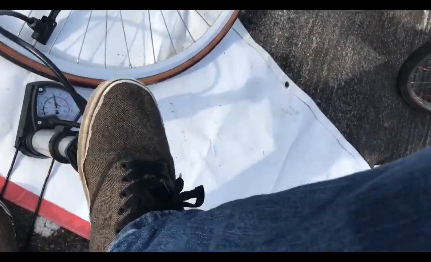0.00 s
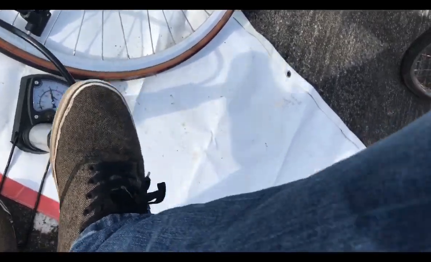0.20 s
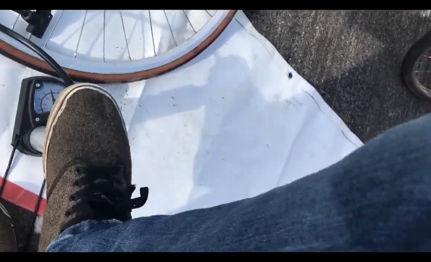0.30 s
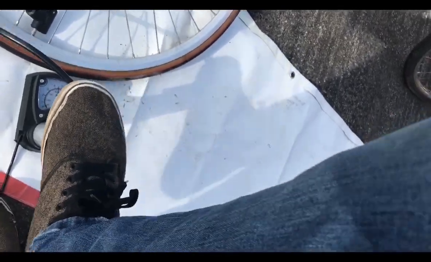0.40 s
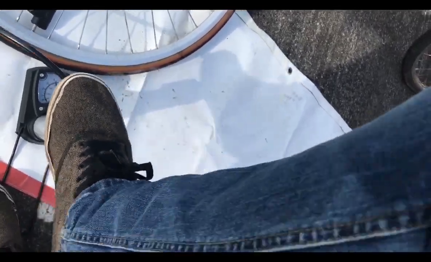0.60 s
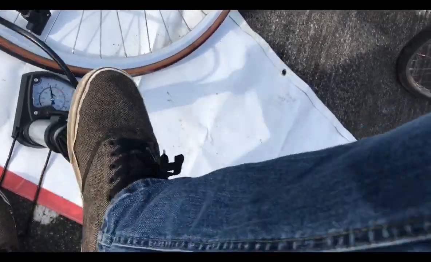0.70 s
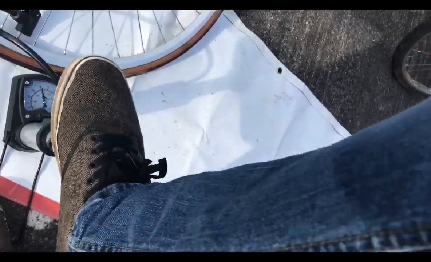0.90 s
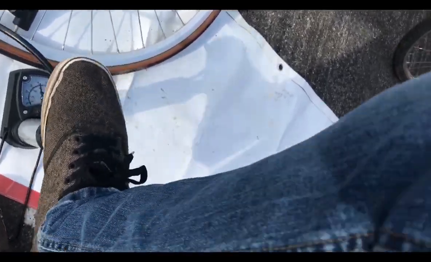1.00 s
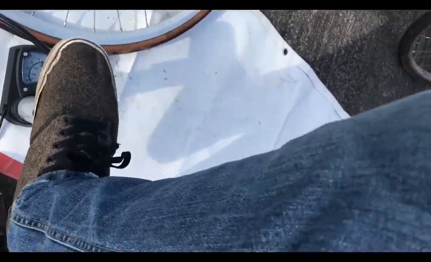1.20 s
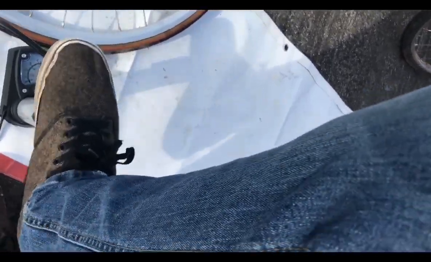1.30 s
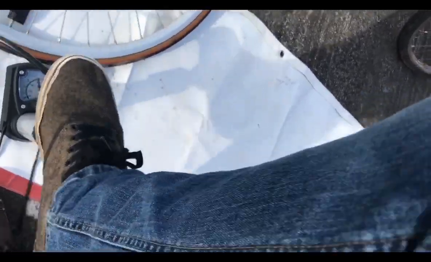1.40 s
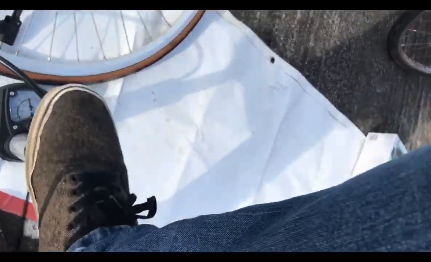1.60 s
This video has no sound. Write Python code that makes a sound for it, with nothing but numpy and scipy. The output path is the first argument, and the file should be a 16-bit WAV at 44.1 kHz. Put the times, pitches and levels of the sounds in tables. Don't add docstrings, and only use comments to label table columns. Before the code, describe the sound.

A foot-operated bicycle pump clacks through two strokes, with brief squeaks and short airy hisses outdoors.

```python
import sys
import numpy as np
from scipy import signal
from scipy.fft import rfft, irfft
from scipy.io import wavfile
from scipy.ndimage import uniform_filter1d

SR = 44100
rng = np.random.default_rng(int(sys.argv[2]) if len(sys.argv) > 2 else 0)


def file_out(sig):
    cols = np.atleast_2d(sig).T
    lim = np.clip(cols, -1, 1)
    pcm = np.round(lim * 32767).astype(np.int16)
    wavfile.write(sys.argv[1], SR, pcm)


def makeup_ratio(level_db):
    decades = np.asarray(level_db, float) / 20
    return 10 ** decades


N = 74970

# [frequency_hz, density_db]
TOWN_SPECTRUM = [(28, -7), (62, -3), (230, -14), (480, -24.5), (1050, -18.5), (2200, -31.5), (5000, -44.5),
                 (16000, -77)]
TOWN_DB, DRONE_HZ, DRONE_DB = -50.5, 68, -59

# [frequency_hz, density_db]
HISS_SPECTRUM = [(900, -31), (1600, -8.5), (3400, -2), (5200, -12), (8500, -2), (10300, -3), (12200, -2),
                 (16000, -5)]
# [frequency_hz, density_db]
RUB_SPECTRUM = [(250, 1), (500, -8), (900, -2), (1400, -10), (2500, -13), (4500, -16.5), (8000, -20.5)]
# [middle_s, rise_s, fall_s, hiss_db, rub_db]
SWELLS = [(.00, .02, 0.0073, -57.5, -51.5), (0.114, 0.021, 0.03, -55.5, -49.5),
          (.20, 0.018, 0.11, -68, -51), (0.363, 0.035, 0.015, -51.5, -45.5), (.54, 0.05, 0.17, -66, -55.5),
          (.586, 0.019, 0.026, -68, -49), (0.645, 0.023, 0.047, -44.5, -52),
          (0.661, 0.018, 0.024, -40.5, -74), (0.867, 0.023, 0.043, -56.5, -51),
          (.96, 0.044, 0.039, -73, -52), (1.115, 0.058, 0.016, -56.5, -45.5),
          (1.179, 0.12, 0.018, -90, -55.5), (1.24, 0.021, 0.03, -65.5, -59.5),
          (1.352, 0.04, 0.051, -63.5, -51.5), (1.408, 0.02, 0.052, -44.5, -50.5),
          (1.431, 0.024, 0.028, -45.5, -72), (1.64, 0.026, 0.04, -64, -49.5)]
# [frequency_hz, width_hz, level_db]
CAVITIES = [(4280, 130, -4.5), (6150, 690, 2.5), (8650, 167, -1.5), (9580, 260, -2.5), (11950, 1200, 0),
            (14550, 770, -3.5)]

# [start_s, level_db, pitch_hz, t60_s]
KNOCKS = [(0.08, -30.5, 380, 0.0081), (.132, -32, 740, 0.0098), (.171, -33, 880, 0.012),
          (0.2281, -20.5, 940, 0.007), (1.329, -39, 611, 0.033), (0.364, -30.5, 514, 0.016),
          (.5445, -29.5, 653, 0.012), (0.614, -38, 987, 0.018), (.835, -39.5, 734, 0.014),
          (.904, -39, 358, 0.0073), (0.9694, -31.5, 636, 0.014), (1.110, -40.5, 297, 0.046),
          (1.1294, -19.5, 400, 0.014), (1.394, -35, 930, 0.0098), (1.467, -50.5, 1375, 0.018),
          (1.614, -39, 910, 0.0079), (1.624, -31.5, 776, 0.0084), (1.656, -44, 805, 0.013),
          (.2945, -43.5, 830, 0.011), (.304, -43, 880, .016), (.312, -44, 900, .014),
          (.320, -45.5, 785, 0.023), (.950, -38.5, 940, 0.011), (1.1055, -24.5, 856, 0.01),
          (1.1075, -31, 1100, 0.015), (1.1115, -34.5, 1050, 0.021), (1.178, -55, 884, 0.098),
          (1.198, -55.5, 865, 0.045), (1.232, -55.5, 810, .02), (1.345, -43.5, 760, 0.015),
          (1.571, -47.5, 403, 0.021)]
# [start_s, level_db, pitch_hz, length_s]
SCUFFS = [(0.0788, -37.5, 3270, 0.007), (0.086, -44, 3080, 0.0014), (0.0996, -40, 2190, 0.0048),
          (0.128, -39, 2400, 0.004), (0.908, -43, 1600, 0.0025), (0.17, -39.5, 2010, 0.0042),
          (0.2285, -24.5, 3720, 0.0026), (0.23, -58, 5200, 0.0015), (0.3666, -31, 1800, 0.001),
          (0.5442, -30, 2370, 0.0062), (0.5445, -32, 3720, 0.0016), (0.614, -36.5, 3920, 0.0023),
          (0.6524, -33, 1890, 0.0025), (0.737, -48, 3050, 0.0036), (0.8356, -28.5, 2950, 0.0024),
          (0.8385, -40.5, 3500, 0.006), (0.8414, -56, 3240, 0.0014), (0.956, -42, 2430, 0.0058),
          (1.107, -30.5, 2470, 0.0021), (1.3267, -29, 1690, 0.0025), (1.3927, -34, 1960, 0.0015),
          (1.5313, -43, 2370, 0.002), (1.573, -43.5, 2000, 0.003), (1.4, -46, 1980, .002),
          (1.552, -52, 2500, .002), (0.188, -44, 2600, .002), (1.6123, -41, 1960, 0.0043)]
# [start_s, level_db, length_s]
TICKS = [(0.158, -36.5, 0.0025), (0.1644, -42, 0.0023), (0.1712, -33.5, 0.0039), (0.1917, -30, 0.0036),
         (0.2045, -30, 0.0033), (0.216, -27, 0.0011), (0.23, -25, 0.0024), (0.3656, -29.5, 0.0057),
         (0.5446, -34.5, 0.0033), (0.782, -50, 0.0064), (0.832, -42, 0.002), (0.26, -44, .002),
         (0.9053, -32.5, 0.0017), (0.9316, -34, 0.003), (0.941, -38, 0.0023), (0.9509, -23, 0.0016),
         (0.953, -33, 0.0036), (0.997, -43.5, 0.013), (1.1297, -24.5, 0.0018), (1.329, -30.5, 0.0011),
         (1.529, -44, 0.0023), (1.555, -68, 0.0018), (1.5725, -47, 0.0015), (1.6878, -34.5, 0.0021)]
# [start_s, level_db, length_s]
LEAKS = [
    (0.61, -43, .014),
    (1.415, -34, 0.015),
    (.645, -33, 0.023),
]

# [start_s, level_db, pitch_hz, t60_s, push_or_pull (1 or -1)]
THUMPS = [(0.19, -51, 60, 0.13, 1), (0.247, -40, 68, 0.08, 1), (0.384, -50, 75, 0.066, 1),
          (0.408, -46, 96, 0.09, 1), (0.454, -46, 79, 0.084, 1), (0.6, -26.5, 106, 0.032, 1),
          (0.662, -48, 62, 0.11, 1), (0.8278, -40.5, 72.5, 0.18, -1), (0.866, -35, 63.7, 0.13, 1),
          (1.139, -43, 162, 0.1, 1), (1.169, -44.5, 235, 0.086, 1), (1.3718, -25, 155, 0.033, -1),
          (1.38, -35.5, 76.5, 0.081, 1), (1.415, -46.5, 58.5, 0.12, 1), (1.54, -52, 88, 0.068, 1)]

# [peak_s, level_db, pitch_hz, sag_hz_per_ms, rise_ms]
BLOWS = [
    (.3657, -24, 760, 60, 1.0),
    (.3691, -17, 960, 60, 1.7),
    (.5464, -22, 1120, 70, 1.7),
    (1.13, -30, 2500, 60, 1.2),
    (1.1306, -36, 4600, 60, 1.2),
    (.2304, -26, 4300, 300, 1.0),
    (1.1311, -11, 960, 270, 1.5),
    (1.3298, -16, 930, 220, 1.5),
]
BLOW_FALL_MS = 1.1
# [start_s, level_db, low_mode_db]
REBOUNDS = [
    (.3716, -19.5, -5),
    (.5481, -27, -12),
    (1.1325, -12.5, -20),
    (1.3323, -23, -2),
]
# [frequency_hz, level_db, t60_s]
FRAME_MODES = [(247, -14, 0.061), (400, -17, 0.0067), (667, -5, 0.021), (830, 6, 0.004), (1050, 0, 0.016),
               (1250, -35, 0.0098), (2470, -8.5, 0.0048)]
# [start_s, level_db]
STRUT_PINGS = [(0.344, -65), (.372, -43.5), (.5478, -42.5), (1.046, -50), (1.084, -41), (1.329, -37.5),
               (1.395, -50)]
STRUT_HZ, STRUT_T60_S = 1934, 0.057

# [time_s, pitch_hz, level_db]
SQUEAKS = [
    [(.326, 930, -62), (.333, 935, -52), (.341, 905, -47), (.347, 885, -36), (.353, 882, -31),
     (.358, 884, -34), (.362, 888, -38), (.3655, 880, -37)],
    [(1.056, 850, -66), (1.066, 868, -48), (1.074, 874, -38), (1.081, 878, -30.5), (1.088, 878, -35),
     (1.097, 876, -35), (1.105, 877, -41), (1.118, 880, -44), (1.125, 890, -58)],
]
# [frequency_ratio, level_db]
SQUEAK_PARTIALS = [(1, 3.5), (.87, -20), (1.13, -15), (1.96, -14.5), (2.2, -24), (3, -31), (4, -31)]
SQUEAK_ROUGH_DB, PARTIAL_ROUGH_DB, SQUEAK_JITTER = 1.2, 3.5, .009

# [start_s, length_s, level_db]
RETURNS = [
    (0.618, .115, -57.5),
    (1.39, .115, -58),
]
BARREL_START_HZ, BARREL_END_HZ, BARREL_WIDTH_HZ = 2710, 7280, 560

ECHO_DB, ECHO_T60_S = -22, .05

# [frequency_hz, gain_db]
TREBLE_TOP = [(15750, 0), (15950, -60)]
# [peak_s, level_db]
SHARP_CLICKS = [
    (.2295, -24),
    (.9515, -6),
    (1.1305, -6),
]
# [frequency_hz, gain_db]
TREBLE_OPEN_TOP = [(16700, 0), (16960, -30)]
SHARP_S = .0025


def shape(x, table):
    hz = np.maximum(np.fft.rfftfreq(N, 1 / SR), 1)
    points = np.array(table, float)
    gain_db = np.interp(np.log(hz), np.log(points[:, 0]), points[:, 1])
    return irfft(rfft(x) * makeup_ratio(gain_db), N)


def level(x, db):
    return x * makeup_ratio(db) / np.sqrt(np.mean(x ** 2))


def walk(rate_hz):
    hold = int(SR / rate_hz)
    steps = rng.standard_normal(1000)[np.arange(N) // hold]
    smooth = uniform_filter1d(uniform_filter1d(steps, hold), hold)
    return level(smooth, 0)


def add(out, start_s, x):
    i = int(start_s * SR)
    out[i:i + len(x)] += x[:max(N - i, 0)]


def ring(hz, t60_s, rise_s):
    t = np.arange(SR // 10) / SR
    rise = 1 - np.exp(-t / max(rise_s, 1e-5))
    decay = np.exp(-np.log(1000) * t / t60_s)
    return rise * decay * np.sin(2 * np.pi * hz * t)


def burst(lo_hz, hi_hz, length_s, rise_s):
    t = np.arange(SR // 10) / SR
    band = signal.butter(3, [lo_hz, min(hi_hz, .45 * SR)], "band", fs=SR, output="sos")
    envelope = (1 - np.exp(-t / rise_s)) * np.exp(-t / length_s)
    x = signal.sosfilt(band, rng.standard_normal(len(t)) * envelope)
    return x / np.abs(x).max()


def patchy(table, quick_db, slow_db):
    octave = np.log2(np.fft.rfftfreq(N, 1 / SR) + 1)
    spectrum = rfft(shape(rng.standard_normal(N), table))
    out = np.zeros(N)
    for centre in np.arange(4.2, 14.8, .7):
        weight = np.clip(1 - np.abs(octave - centre) / .7, 0, 1)
        flicker_db = quick_db * walk(40.34) + slow_db * walk(8.31)
        out += irfft(spectrum * weight, N) * makeup_ratio(flicker_db)
    return level(out, 0)


def cavities(x, depth_db):
    resonant = np.zeros(len(x))
    for hz, width_hz, db in CAVITIES:
        b, a = signal.iirpeak(hz, hz / width_hz, fs=SR)
        resonant += makeup_ratio(db) * signal.lfilter(b, a, x)
    return x + makeup_ratio(depth_db) * resonant


def town():
    drone_band = [(30, -30), (0.66 * DRONE_HZ, -8), (DRONE_HZ, 0), (1.08 * DRONE_HZ, -9), (160, -40)]
    drone = shape(rng.standard_normal(N), drone_band)
    traffic = patchy(TOWN_SPECTRUM, quick_db=1, slow_db=1.5)
    return makeup_ratio(TOWN_DB) * traffic + level(drone, DRONE_DB)


def air():
    t = np.arange(N) / SR
    hiss_power, rub_power = np.zeros(N), np.zeros(N)
    for middle_s, rise_s, fall_s, hiss_db, rub_db in SWELLS:
        bell = np.exp(-((t - middle_s) / np.where(t < middle_s, rise_s, fall_s)) ** 2)
        hiss_power += bell * makeup_ratio(2 * hiss_db)
        rub_power += bell * makeup_ratio(2 * rub_db)
    hiss = level(cavities(patchy(HISS_SPECTRUM, quick_db=2.5, slow_db=3.0), depth_db=0), 0)
    hiss = hiss * makeup_ratio(1.43 * walk(150))
    rub = patchy([(100, -35)] + RUB_SPECTRUM, quick_db=1.5, slow_db=-0.06)
    return hiss * np.sqrt(hiss_power) + rub * np.sqrt(rub_power)


def linkage():
    out = np.zeros(N)
    for s, db, hz, t60_s in KNOCKS:
        knock = ring(hz, t60_s, 0.0015)
        knock += 0.27 * ring(1.33 * hz, t60_s, 0.0009)
        knock += 0.22 * ring(0.67 * hz, t60_s, 0.007)
        add(out, s + 0.00092, makeup_ratio(db + 12.5) * knock)
    for s, db, hz, length_s in SCUFFS:
        scuff = 1.26 * ring(hz, 3 * length_s, 0.00046)
        scuff += .2 * ring(1.285 * hz, 3 * length_s, 0.0011)
        scuff += 0.87 * burst(0.43 * hz, 1.556 * hz, length_s, 0.00053)
        add(out, s, makeup_ratio(db) * scuff)
    for s, db, length_s in TICKS:
        grit = burst(3640, 11600, 0.83 * length_s, 0.00005)
        grit += 0.7 * burst(14100, 17800, 0.92 * length_s, 0.0001)
        add(out, s, makeup_ratio(db - 6.5) * cavities(grit, depth_db=2.5))
    for s, db, length_s in LEAKS:
        add(out, s, makeup_ratio(db) * burst(12600, 14000, length_s, .006))
    return out


def ground():
    out = np.zeros(N)
    for s, db, hz, t60_s, push in THUMPS:
        add(out, s - .0015, np.sign(push) * makeup_ratio(db + 9) * ring(hz, t60_s, .005))
    return out


def frame():
    out = np.zeros(N)
    half = 220
    ms = np.arange(-half, half) / SR * 1000
    for s, db, hz, sag, rise_ms in BLOWS:
        bell = np.exp(-(ms / np.where(ms < 0, rise_ms, BLOW_FALL_MS)) ** 2)
        sweep = np.cos(2 * np.pi * (hz - sag * ms / 2) * ms / 1000)
        add(out, s - half / SR, makeup_ratio(db) * bell * sweep)
    for s, db, low_db in REBOUNDS:
        for hz, mode_db, t60_s in FRAME_MODES:
            gain_db = db + mode_db + low_db * (hz < 900)
            add(out, s, makeup_ratio(gain_db) * ring(hz, t60_s, 0.00051))
    for s, db in STRUT_PINGS:
        add(out, s, makeup_ratio(db) * ring(STRUT_HZ, STRUT_T60_S, 0.0018))
    return out


def squeak():
    out, t = np.zeros(N), np.arange(N) / SR
    for stroke in SQUEAKS:
        s, hz, db = np.array(stroke).T
        pitch_hz = np.interp(t, s, hz) * (1 + SQUEAK_JITTER * walk(200))
        phase = 2 * np.pi * np.cumsum(pitch_hz) / SR
        gain = uniform_filter1d(makeup_ratio(np.interp(t, s, db, -120, -120) + 3), size=40)
        for ratio, partial_db in SQUEAK_PARTIALS:
            rough_db = SQUEAK_ROUGH_DB if ratio == 1 else PARTIAL_ROUGH_DB
            out += gain * makeup_ratio(partial_db + rough_db * walk(220)) * np.sin(ratio * phase)
    return out


def barrel():
    out = np.zeros(N)
    lowpass = signal.butter(2, BARREL_WIDTH_HZ, fs=SR, output="sos")
    for s, length_s, db in RETURNS:
        travel = np.linspace(0, 1, int(length_s * SR))
        breath = signal.sosfilt(lowpass, rng.standard_normal((2, 9000)))[:, :len(travel)]
        pitch_hz = BARREL_START_HZ + (BARREL_END_HZ - BARREL_START_HZ) * travel
        phase = 2 * np.pi * np.cumsum(pitch_hz) / SR
        hiss = breath[0] * np.cos(phase) + breath[1] * np.sin(phase)
        add(out, s, level(hiss, db) * np.sqrt(np.sin(np.pi * travel) + 1e-9))
    return out


def scatter(hits):
    t = np.arange(8000) / SR
    decay = np.exp(-np.log(1000) * t / ECHO_T60_S)
    tail = rng.standard_normal(len(t)) * decay * (t > .003)
    tail *= makeup_ratio(ECHO_DB) / np.sqrt(np.sum(tail ** 2))
    return signal.fftconvolve(hits, tail)[:N]


def scene():
    background = town() + air()
    hits = linkage() + frame()
    return (background + hits + scatter(hits) + ground() + squeak() + barrel())[None]


def top_cut(x):
    return signal.sosfilt(signal.butter(12, 16970, fs=SR, output="sos"), x)


def record(dry):
    t = np.arange(N) / SR
    cut = shape(dry[0], TREBLE_TOP)
    gate = np.zeros(N)
    for s, db in SHARP_CLICKS:
        gate += makeup_ratio(db) * np.exp(-((t - s) / SHARP_S) ** 2)
    top = shape(gate * (dry[0] - cut), TREBLE_OPEN_TOP)
    return top_cut((cut + top)[None])


dry = scene()
out = record(dry)
file_out(out)
```